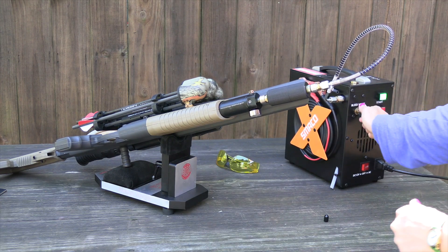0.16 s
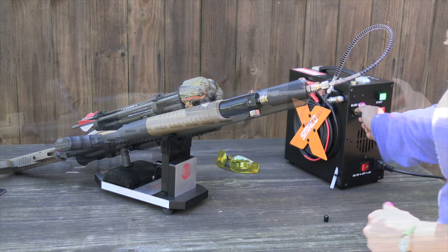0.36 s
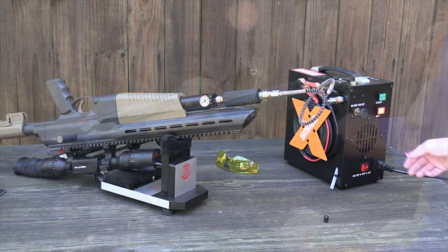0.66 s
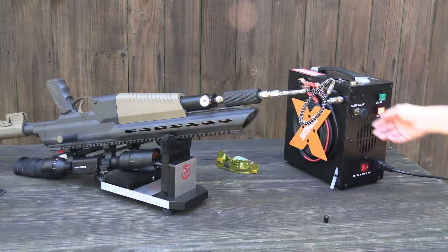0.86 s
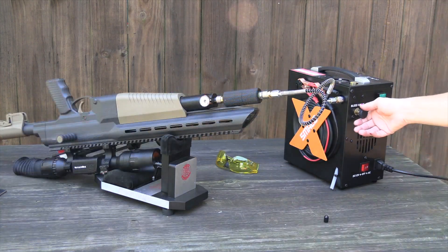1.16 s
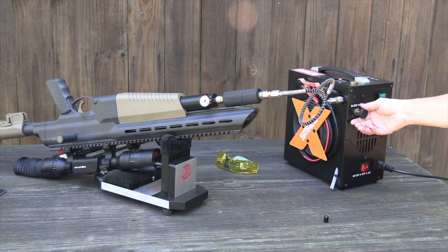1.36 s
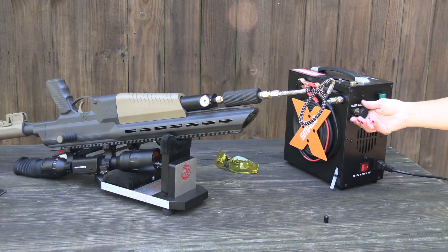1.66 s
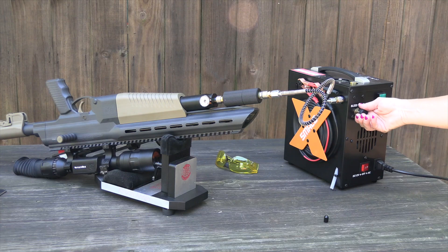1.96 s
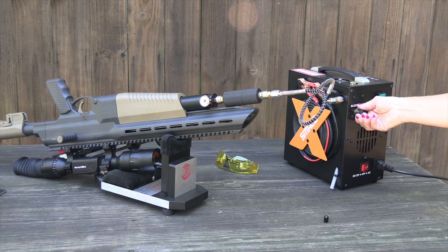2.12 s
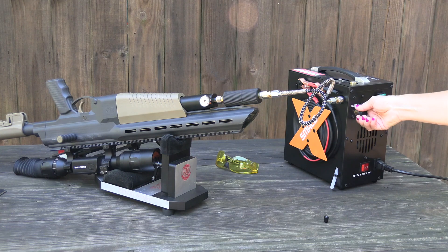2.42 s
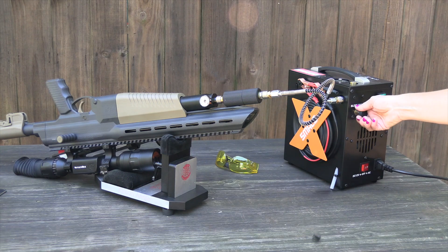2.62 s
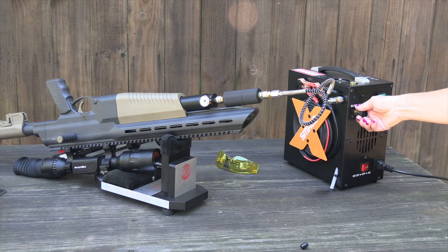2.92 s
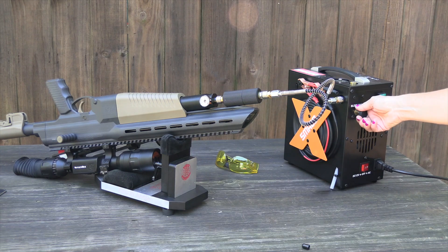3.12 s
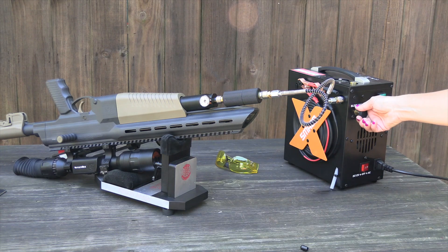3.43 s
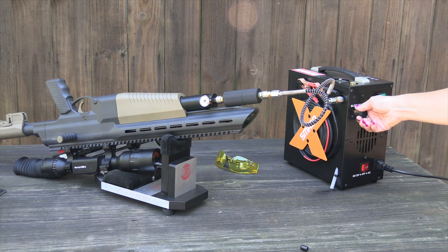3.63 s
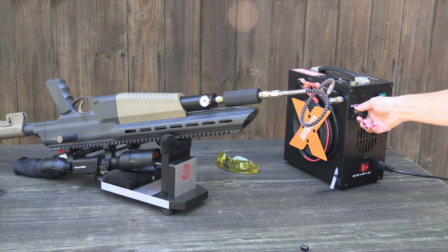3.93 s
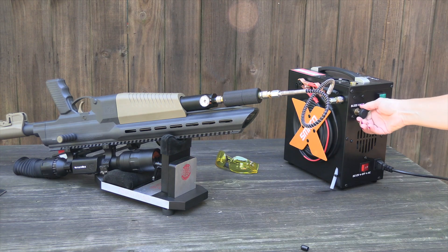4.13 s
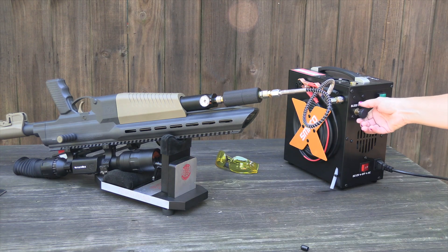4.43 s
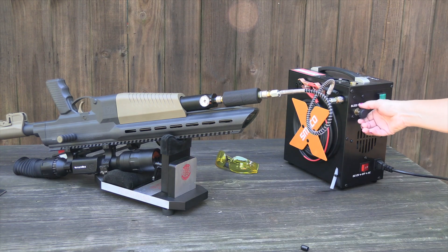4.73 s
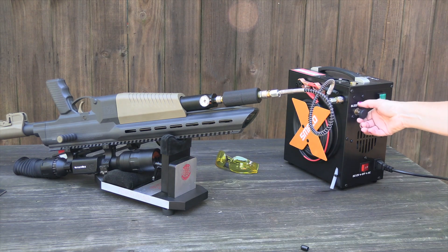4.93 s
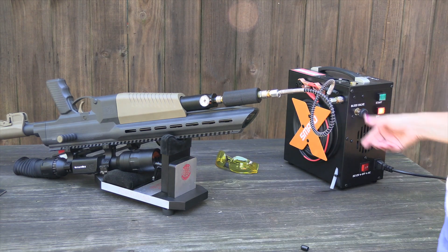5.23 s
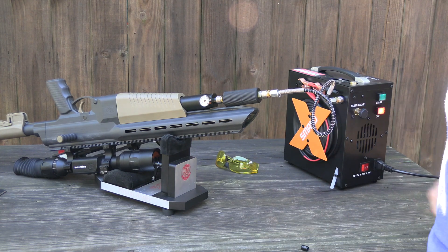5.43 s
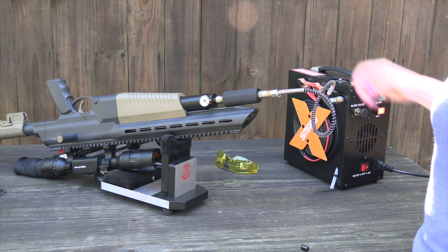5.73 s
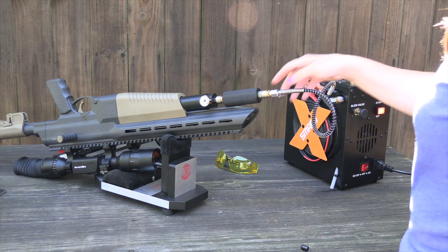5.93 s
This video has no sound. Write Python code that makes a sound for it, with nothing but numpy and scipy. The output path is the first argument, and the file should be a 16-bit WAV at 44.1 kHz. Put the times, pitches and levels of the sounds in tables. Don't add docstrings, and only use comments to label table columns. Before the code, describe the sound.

Outdoors, a small compressor runs near the microphone. From 0 to about 0.3 s its pump chugs loudly, nearly seven dull metallic thumps a second over motor drone, then crossfades by 0.7 s into quieter steady fans: rushing air through a resonant metal case, blade tones and a thin electronic whine, creeping slightly louder. Low wind rumble swells softly. At 2.5 s a valve pops open into bright, forceful hiss with brief low flutter and a piercing squeal near 5 kHz. The automatic gain quickly buries the fans. The whistle and its octave tumble downward, unstable, breathy, catching momentarily on pitches, reaching about 1 kHz by 4 s and vanishing near 4.35. The hiss holds steady, dips around 4.25, surges brighter at 4.4, weakens and stops at 4.9. Fans and whine swell back by about 5.1 and continue steadily to 6 s, with faint gusts.

```python
import sys
import numpy as np
from scipy import signal
from scipy.fft import rfft, irfft, next_fast_len
from scipy.io import wavfile
from scipy.ndimage import uniform_filter1d

SR = 44100
rng = np.random.default_rng(int(sys.argv[2]) if len(sys.argv) > 2 else 0)


def invert_db(level):
    return 10 ** (np.asarray(level, dtype=float) / 20)


def to_wav(sig):
    pcm = np.clip(np.atleast_2d(sig), -1, 1) * 32767
    pcm = np.round(pcm).astype(np.int16)
    wavfile.write(sys.argv[1], SR, pcm.T)


N = 267771

FADE_START_S, FADE_END_S = 0.31, 0.71

# frequency in Hz, level in dB per Hz.
PUMP_COLOUR = [(65, -56), (110, -33), (180, -15.5), (308, -10), (406, -5.5), (535, -13), (705, -2.5),
               (1050, -15), (1650, -14.5), (2050, -20.5), (3360, -21.5), (4440, -23), (8350, -24.5),
               (11200, -36), (12400, -61), (16100, -116), (22000, -120)]
PUMP_NOISE_DB = -29.5
# frequency in Hz, level in dB.
PUMP_TONES = [(371, -37.5), (802, -53), (1605, -42.5), (1705, -41.5), (3410, -45), (5115, -50.5),
              (6820, -54)]
FIRST_STROKE_S, TURN_S = -0.077, 0.1478
# delay in s, frequency in Hz, rise in s, fall in s, level in dB.
STROKE_RINGS = [
    (0.00063, 444, 0.011, 0.0051, -17.5),
    (.046, 201, 0.0027, 0.014, -28),
    (0.058, 417, 0.0095, 0.0066, -27.5),
    (0.021, 640, 0.0057, 0.0067, -32),
    (0.01028, 920, 0.03, 0.022, -35.5),
    (.02, 1170, 0.0081, 0.016, -34),
    (0.023, 375, 0.0044, 0.023, -36),
]

RUMBLE_DB, RUMBLE_DUCKED = -61, 0.75
# frequency in Hz, level in dB per Hz.
RUMBLE_COLOUR = [(8.8, -31), (15, 1), (39, 0.5), (81, -7.5), (113, -10), (150, -13), (200, -34),
                 (330, -120)]
# time in s, length in s, added level in dB.
GUSTS = [
    (.5, 0.35, 6),
    (1.27, 0.23, 8),
    (1.9, .9, 5),
    (5.401, .25, 3),
    (5.75, .3, 4),
]

# frequency in Hz, level in dB per Hz.
AIR_EARLY = [(65, -57), (110, -36), (177, -7.5), (252, -11.5), (367, 1.5), (504, -12), (764, -4.5),
             (1110, -12.5), (1530, -10), (2010, -14.5), (2310, -9.5), (3710, -17), (8520, -16.5),
             (11200, -26), (12400, -33), (16100, -99), (22000, -120)]
# frequency in Hz, level in dB per Hz.
AIR_LATE = [(65, -52), (110, -21.5), (390, -5.5), (524, -16), (692, -11), (1130, -14.5), (1750, -12.5),
            (2130, -16.5), (2870, -21.5), (3360, -17), (4180, -21), (5200, -19.5), (9040, -21),
            (11200, -29), (12400, -49), (16100, -105), (22000, -120)]
# frequency in Hz, width in Hz, boost in dB.
CASE = [(396, 43, 3.5), (688, 139, 15), (979, 48, 7.5), (1240, 80, 5.5), (1414, 114, 5), (2330, 200, 1.5),
        (2880, 230, 1), (5150, 630, 4), (6750, 800, 1.5)]
# time in s, frequency in Hz.
BIG_FAN = [(.4, 1566), (.8, 1557), (1.1, 1552), (1.6, 1560), (2.45, 1570), (3.2, 1560), (4, 1566),
           (4.85, 1578), (5.3, 1580), (5.7, 1572), (6.07, 1564)]
# multiple of that frequency, level in dB against the fans.
BIG_TONES = [(.5, -10), (1, -10.5), (1.5, -25)]
# time in s, frequency in Hz.
SMALL_FAN = [(.4, 1872), (2.45, 1876), (4.7, 1880), (5.05, 1893), (6.07, 1888)]
# multiple of that frequency, level in dB against the fans.
SMALL_TONES = [(.098, -21), (.2, -15.5), (0.65, -25.5), (1.599, -29.5)]
TENTH_EARLY_DB, TENTH_LATE_DB = -19.5, -13
# time in s, frequency in Hz.
WHINE = [(.4, 1706), (.9, 1709), (1.7, 1711), (2.5, 1709.5), (4.8, 1710), (5.2, 1713), (5.5, 1710),
         (6.07, 1709)]
WHINE_DB = [-11, -18, -20, -23, -40]
SHADE_ON_S, SHADE_OFF_S, SHADE_MOVE_S, WHINE_SHADE_DB = 0.8, 4.6, 0.4, -3.5
FANS_DB, CREEP_DB_PER_S, CREEP_S, LATE_DB = -35, 1.5, 1.57, -1.5

DUCK_DB, DUCK_FALL_S, DUCK_CREEP_DB_PER_S = 20, 0.05, 2.5
RELEASE_S, RELEASE_LENGTH_S = 4.43, 0.64

# time in s, lowest Hz, highest Hz, level in dB.
STRAY_BANDS = [(1.206, 6170, 7580, -51), (1.974, 4200, 5700, -50), (2.043, 7550, 9650, -50),
               (2.09, 5200, 6350, -52), (2.158, 4250, 5150, -51), (2.181, 4200, 5150, -49),
               (2.206, 5170, 6200, -51), (2.786, 4650, 6250, -42), (2.811, 4150, 5120, -47),
               (3.274, 7530, 10900, -35), (4.53, 4200, 5120, -48), (5.782, 5700, 7580, -49)]

OPEN_S, POP_DB, POP_S = 2.493, 3.5, 0.012
# time in s, level in dB.
JET = [
    (2.49, -27.5),
    (2.71, -31.5),
    (4.09, -31.5),
    (4.26, -37),
    (4.37, -32),
    (4.47, -31),
    (4.55, -37),
    (4.65, -35.5),
    (4.93, -44.5),
]
# frequency in Hz, level in dB per Hz.
HISS = [(40, -49), (120, -16.5), (300, -26), (900, -11), (2050, -10.5), (2700, -5.5), (4600, -2), (5800, 0),
        (8260, 3.5), (10000, -1), (11800, -4.5), (12400, -15), (16000, -60)]
USUAL_DB, TOP_PER_DB, BODY_PER_DB, WIDE_S, WIDE_TOP_DB = -31.5, 0.5, -0.13, 4.3, 4.5
FLUTTER_DB, FLUTTER_S, FLUTTER_END_DB = 19, 0.47, -2
# multiple of its pitch, width as share of that, boost in dB.
RIDGES = [(1, 0.16, 4), (2, 0.13, 2.5)]
# start in s, spacing of crests in Hz, place of one crest in Hz, depth in dB.
HAND = [
    (2.5, 790, 3070, 2.2),
    (3.3, 750, 3250, 3.2),
    (4.1, 870, 3570, 3.8),
    (4.62, 850, 3740, 4.5),
]
REGRIP_S = 0.1
# frequency in Hz, width in Hz, dB at the opening, dB at the end.
SHADOWS = [(5240, 460, -4, -4), (9270, 190, 0, -2), (10900, 370, 2.5, -9), (8100, 410, 0.5, -1)]

# time in s, frequency in Hz, level in dB.
WHISTLE = [
    (2.52, 5240, -42),
    (2.58, 4733, -35.5),
    (2.93, 3795, -52),
    (2.99, 3206, -41),
    (3.32, 2746, -44.5),
    (3.6, 1952, -42.5),
    (3.8, 1459, -42.5),
    (4.0, 1130, -43.5),
    (4.35, 908, -48),
]
DIP_S, DIP_LENGTH_S, DIP_DB = 4.16, 0.1, -11
OCTAVE_DB, OCTAVE_LOSS_DB, OCTAVE_S = -27.5, -27, 0.62
# time in s, length in s, frequency in Hz, level in dB, octave level in dB.
LOCKS = [(2.512, 0.015, 4700, -33, -30), (2.618, 0.042, 4670, -35, -35), (2.946, .03, 4126, -47, -34),
         (3.089, .024, 3800, -37, -33), (3.398, .12, 2530, -43, -50), (3.635, 0.026, 2190, -44, -42.5),
         (3.74, 0.068, 1778, -43, -46), (3.804, 0.026, 1642, -39, -44), (3.87, .075, 1630, -45.5, -40),
         (3.96, 0.051, 1249, -46, -57), (4.235, 0.069, 949, -51.5, -45.5), (4.327, 0.043, 1005, -50, -44.5)]
LOCKED = 0.6
HOP, BREATH = (0.016, 0.075), (0.58, 0.88)
WILD_S, WILD_LENGTH_S = 2.68, 0.3
HOP_PITCH_HZ, HOP_SLOPE = 2300, 0.25
# start in s, length in s, frequency in Hz, level in dB.
SIDE_NOTES = [
    (2.746, 0.24, 3115, -40.5),
    (2.966, 0.094, 3730, -45),
    (3.609, 0.031, 2480, -42),
]


def evened(x):
    return x / np.sqrt(np.mean(x ** 2) + 1e-20)


def read(points, hz):
    f, value = np.transpose(points)
    return np.interp(np.log(hz + 1), np.log(f + 1), value)


def curves(rows, t):
    s, *columns = np.transpose(rows)
    return [np.interp(t, s, c) for c in columns]


def ramp(t, start, length):
    return np.sin(np.pi / 2 * np.clip((t - start) / length, 0, 1)) ** 2


def near(x, centre, width):
    return 1 / (1 + (2 * (x - centre) / width) ** 2)


def drift(rate):
    size = next_fast_len(N)
    z = rfft(rng.standard_normal(N), size)
    slowed = z / (1 + (np.fft.rfftfreq(size, 1 / SR) / rate) ** 2)
    return evened(irfft(slowed, size)[:N])


def noise(colour_db, size, patchy_db, flicker_db):
    hop = size // 4
    frames, hz = N // hop + 5, np.fft.rfftfreq(size, 1 / SR)
    a, b, patches = rng.standard_normal((frames, len(hz), 3)).T
    patches = uniform_filter1d(patches, size=size // 80, axis=0)
    patches = evened(uniform_filter1d(patches, size=9, axis=1))
    flicker = evened(uniform_filter1d(rng.standard_normal(frames), size=3))
    shape = invert_db(colour_db(hz[:, None], np.arange(frames) * hop / SR))
    shape = shape / np.sqrt((shape ** 2).mean(axis=0))
    z = (a + 1j * b) * shape * invert_db(patchy_db * patches + flicker_db * flicker)
    return evened(signal.istft(z, nperseg=size, noverlap=size - hop)[1][:N])


def tone(hz, waver_db, rate):
    phase = 2 * np.pi * (np.cumsum(hz * np.ones(N)) / SR + rng.random())
    return np.sqrt(2) * np.sin(phase) * invert_db(waver_db * drift(rate))


def ducking_db(t):
    u = np.maximum(t - OPEN_S, 0)
    held = -DUCK_DB * (1 - np.exp(-u / DUCK_FALL_S)) + DUCK_CREEP_DB_PER_S * u
    return held * (1 - ramp(t, RELEASE_S, RELEASE_LENGTH_S))


def pump(t):
    swell = invert_db(0.8 * np.cos(2 * np.pi * ((t - FIRST_STROKE_S) / TURN_S - 0.15)))
    running = noise(lambda hz, s: read(PUMP_COLOUR, hz) + 0 * s, size=1024, patchy_db=1.5, flicker_db=0.5)
    out = invert_db(PUMP_NOISE_DB) * swell * running
    out += sum(invert_db(db) * tone(hz, 1.9, 16) for hz, db in PUMP_TONES)
    chance = rng.standard_normal((7, len(STROKE_RINGS), 3))
    for k, row in enumerate(chance):
        for (delay, hz, rise, fall, db), (late, sharp, strong) in zip(STROKE_RINGS, row):
            u = t[:SR] - (FIRST_STROKE_S + k * TURN_S + delay + 0.0008 * late)
            swing = np.exp(-(u / np.where(u < 0, rise, fall)) ** 2 / 2)
            ring = np.sin(2 * np.pi * hz * (1 + 0.011 * sharp) * u)
            out[:SR] += invert_db(db + 0.5 * strong) * swing * ring
    return out


def rumble(t):
    low = noise(lambda hz, s: read(RUMBLE_COLOUR, hz) + 0 * s, size=4096, patchy_db=-1.0, flicker_db=1.0)
    gusts_db = sum(db * near(t, s, length) for s, length, db in GUSTS)
    return invert_db(RUMBLE_DB + gusts_db + RUMBLE_DUCKED * ducking_db(t)) * low


def fans(t):
    def colour_db(hz, s):
        rings = sum(db * near(hz, f, width) for f, width, db in CASE)
        return np.where(s < 4, read(AIR_EARLY, hz), read(AIR_LATE, hz)) + rings

    out = invert_db(0.42) * noise(colour_db, size=2048, patchy_db=-0.25, flicker_db=0.74)
    for track, tones in ((BIG_FAN, BIG_TONES), (SMALL_FAN, SMALL_TONES)):
        hz = curves(track, t)[0] * (1 + 0.000746 * drift(3.5))
        out += sum(invert_db(db) * tone(k * hz, 2.5, 7.0) for k, db in tones)
    out += invert_db(np.where(t < 4, TENTH_EARLY_DB, TENTH_LATE_DB)) * tone(hz, 1.9, 10.0)
    whine_hz = curves(WHINE, t)[0]
    whine = sum(invert_db(db) * tone((k + 1) * whine_hz, 1.28, 6.7) for k, db in enumerate(WHINE_DB))
    shaded = ramp(t, SHADE_ON_S, SHADE_MOVE_S) - ramp(t, SHADE_OFF_S, SHADE_MOVE_S)
    creep_db = CREEP_DB_PER_S * np.clip(t - FADE_END_S, 0, CREEP_S)
    level_db = FANS_DB + creep_db + ducking_db(t) + LATE_DB * (t > OPEN_S)
    return invert_db(level_db) * (out + invert_db(0.3 + WHINE_SHADE_DB * shaded) * whine)


def stray_bands():
    side, hz = np.zeros(N), np.fft.rfftfreq(2048, 1 / SR)
    window = signal.windows.kaiser(2048, 7)
    spectra = rfft(rng.standard_normal((len(STRAY_BANDS), 2048)))
    for (s, low_hz, high_hz, db), z in zip(STRAY_BANDS, spectra):
        start = round(s * SR) - 1024
        band = evened(irfft(z * (hz > low_hz) * (hz < high_hz)))
        side[start:start + 2048] += invert_db(db) * window * band
    return np.array([side, -side])


def path_db(hz, s):
    moves = []
    for old, new in zip(HAND, HAND[1:]):
        moves.append((new[0] - REGRIP_S / 2, *old[1:]))
        moves.append((new[0] + REGRIP_S / 2, *new[1:]))
    spacing, crest, depth_db = curves(moves, s)
    comb = depth_db * np.cos(2 * np.pi * (hz - crest) / spacing) * np.clip((6400 - hz) / 1500, 0.3, 1)
    spent = np.clip((s - 4.2) / 0.3, 0, 1)
    return comb + sum(((1 - spent) * a + spent * b) * near(hz, f, width) for f, width, a, b in SHADOWS)


def jet(t):
    def colour_db(hz, s):
        more_db = curves(JET, s)[0] - USUAL_DB
        top_db = TOP_PER_DB * more_db + WIDE_TOP_DB * ramp(s, WIDE_S, 0.09)
        tilt = top_db * np.clip((hz - 8500) / 3000, 0, 1)
        tilt += BODY_PER_DB * more_db * np.clip((5200 - hz) / 1800, 0, 1)
        flutter_db = FLUTTER_END_DB + FLUTTER_DB * np.exp(-abs(s - OPEN_S) / FLUTTER_S)
        tilt += flutter_db * np.clip((600 - hz) / 250, 0, 1)
        pitch = curves(WHISTLE, s)[0]
        ridges = sum(db * near(hz, k * pitch, share * k * pitch) for k, share, db in RIDGES)
        tilt += (1 - ramp(s, DIP_S, DIP_LENGTH_S)) * ridges
        return read(HISS, hz) + tilt + path_db(hz, s)

    opened = ramp(t, OPEN_S, 0.0064) * np.clip((JET[-1][0] - t) / 0.071, 0, 1)
    pop_db = POP_DB * np.exp(-abs(t - OPEN_S - 0.007) / POP_S)
    hiss = noise(colour_db, size=512, patchy_db=1.4, flicker_db=0.5)
    return invert_db(curves(JET, t)[0] + pop_db + 0.18) * opened * hiss


def whistle(t):
    hz, first_db = curves(WHISTLE, t)
    first_db = first_db + DIP_DB * ramp(t, DIP_S, DIP_LENGTH_S)
    octave_db = OCTAVE_DB + OCTAVE_LOSS_DB * (1 - np.exp(-abs(t - WHISTLE[0][0]) / OCTAVE_S))
    unrest = ramp(t, WILD_S, WILD_LENGTH_S)
    for s, length, lock_hz, lock_db, lock_octave_db in LOCKS:
        held = np.clip(3 * (1 - 2 * abs(t - s) / length), 0, 1)
        hz = hz + held * (lock_hz - hz)
        unrest = unrest * (1 - LOCKED * held)
        first_db = first_db + held * (lock_db - first_db)
        octave_db = octave_db + held * (lock_octave_db - octave_db)
    hop, breath = (calm + np.clip(unrest, 0, 1) * (wild - calm) for calm, wild in (HOP, BREATH))
    hop = hop * (1 + unrest * ((HOP_PITCH_HZ / hz) ** HOP_SLOPE - 1))
    hz = hz * (1 + hop * (0.55 * drift(70) + 0.9 * drift(350)))
    turns = np.cumsum(hz) / SR
    sounding = ramp(t, OPEN_S + 0.0051, 0.006) * np.clip((WHISTLE[-1][0] - t) / 0.025, 0, 1)
    out = 0
    for k, db, width in ((1, first_db, 250), (2, octave_db, 270)):
        puffs = np.interp(turns * SR / 4500, np.arange(N), drift(width) + 1j * drift(width))
        cloud = np.sqrt(1 - breath) + np.sqrt(breath / 2) * puffs
        voice = np.sqrt(2) * (cloud * np.exp(2j * np.pi * k * turns)).real
        out += invert_db(db + 2.5 + 0.17 * path_db(k * hz, t)) * voice
    return sounding * out


def side_notes(t):
    wobble = np.cumsum(1 + 0.035 * drift(60)) / SR
    breath = drift(150) + 1j * drift(150)
    out = 0
    for s, length, hz, db in SIDE_NOTES:
        swell = np.sin(np.pi * np.clip((t - s) / length, 0, 1))
        out += invert_db(db - 0.5) * swell * (breath * np.exp(2j * np.pi * hz * wobble)).real
    return out


def scene():
    t = np.arange(N) / SR
    later = np.clip((t - FADE_START_S) / (FADE_END_S - FADE_START_S), 0, 1)
    machine = (1 - later) * pump(t) + later * fans(t)
    mono = machine + rumble(t) + jet(t) + whistle(t) + side_notes(t)
    return np.array([mono, mono])


def thin_top(x):
    hz, s, z = signal.stft(x, SR, nperseg=1024, noverlap=768)
    hz = hz[:, None]
    wander = 0.5 + 0.4 * evened(uniform_filter1d(rng.standard_normal(len(s)), size=14))
    wander = np.repeat(np.clip(wander, 0, 1)[::4], 4)[:len(s)]
    loud = (s > OPEN_S) & (s < 4.85)
    lowest_hz, highest_hz = 11400, 11900
    keep = hz < highest_hz - (highest_hz - lowest_hz) * wander * np.where(loud, 0.25, 1)
    keep |= (abs(s - 2.515) < 0.014) & (hz < 12400)
    masked = (s > 2.548) & (s < 2.63) & (hz > 2.1 * curves(WHISTLE, s)[0])
    keep &= ~masked | (abs(hz - 11650) < 130)
    power = uniform_filter1d(abs(z[0]) ** 2, size=3, axis=0)
    power = uniform_filter1d(power, size=6, axis=1)
    around = uniform_filter1d(power, size=41, axis=0)
    keep &= power > around * np.clip((hz - 5000) / 5500, 0, 1) * 0.44
    return signal.istft(z * np.where(keep, 1, 0.002), SR, nperseg=1024, noverlap=768)[1][:, :N]


def low_pass(x):
    return signal.sosfilt(signal.butter(12, 12770, fs=SR, output="sos"), x)


def record(dry):
    mix = thin_top(dry) + stray_bands()
    return low_pass(mix)


dry = scene()
out = record(dry)
to_wav(out)
```